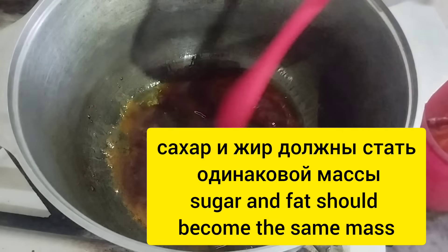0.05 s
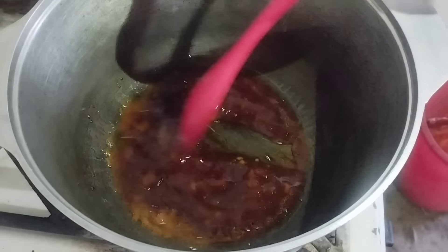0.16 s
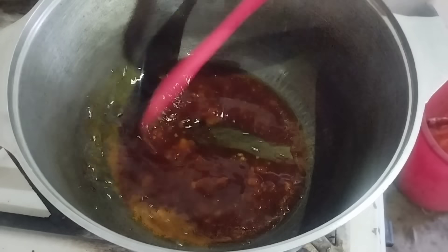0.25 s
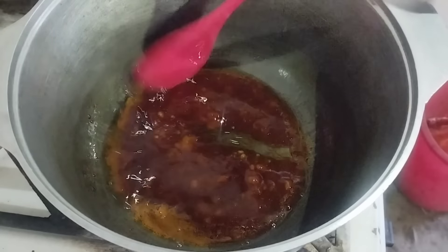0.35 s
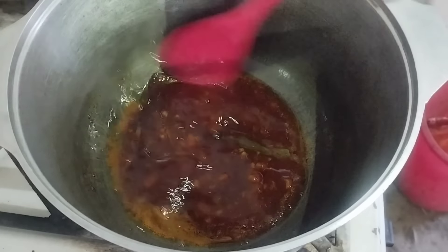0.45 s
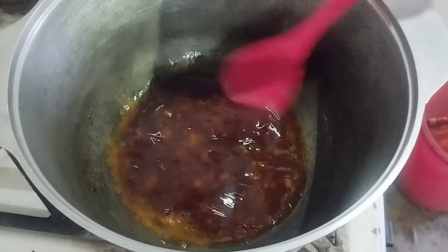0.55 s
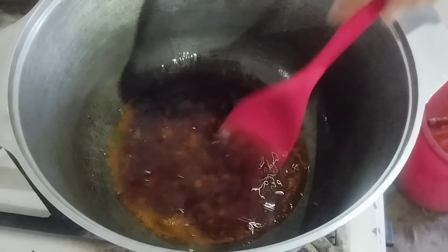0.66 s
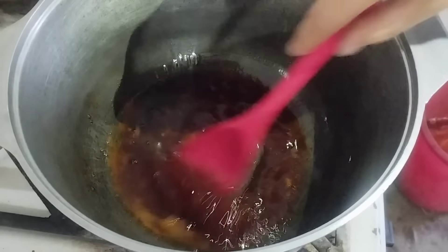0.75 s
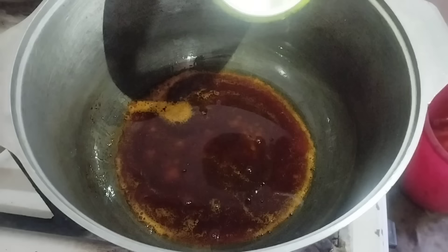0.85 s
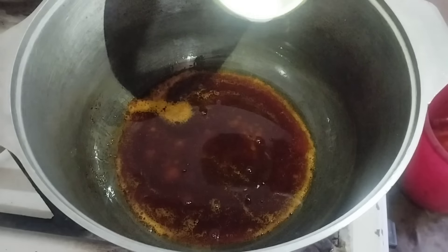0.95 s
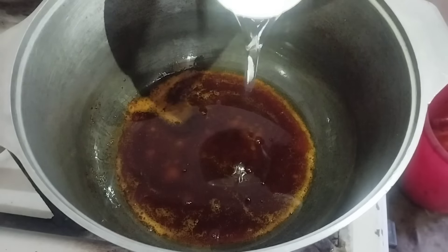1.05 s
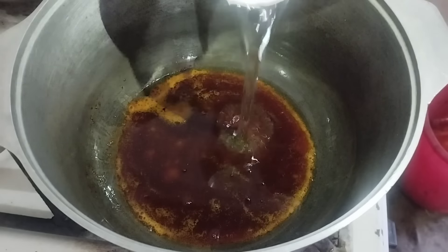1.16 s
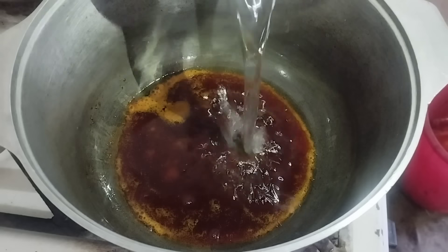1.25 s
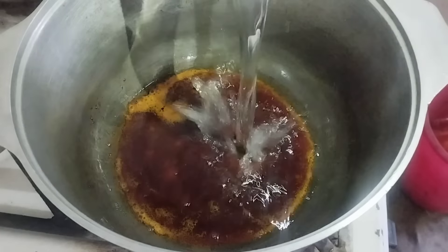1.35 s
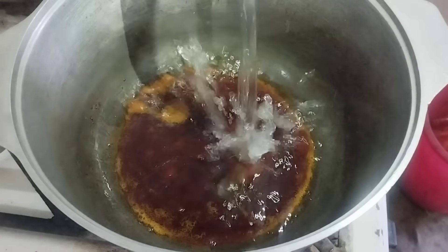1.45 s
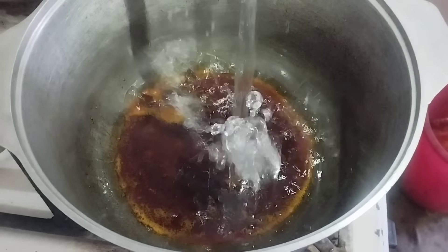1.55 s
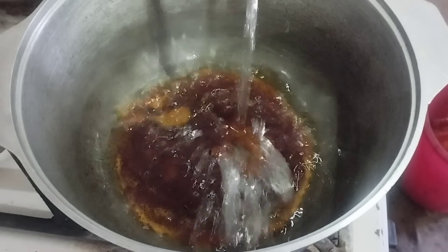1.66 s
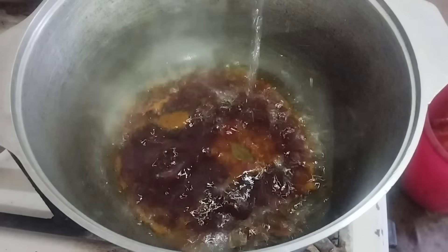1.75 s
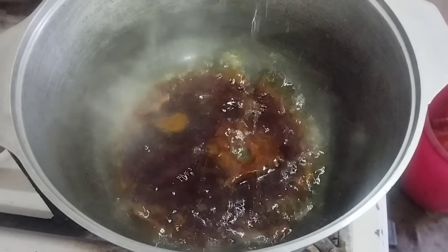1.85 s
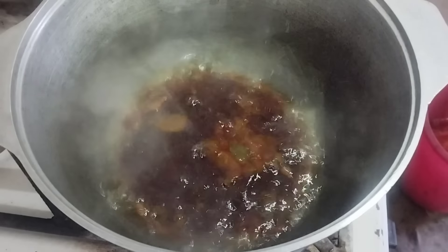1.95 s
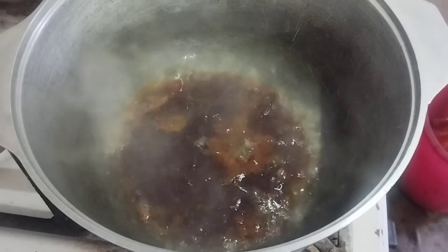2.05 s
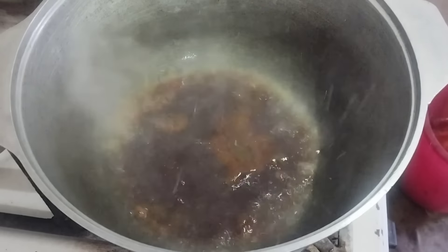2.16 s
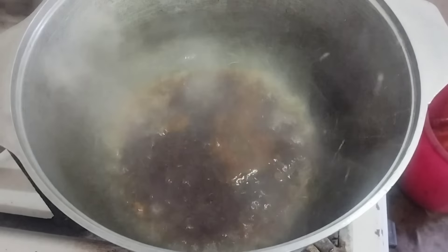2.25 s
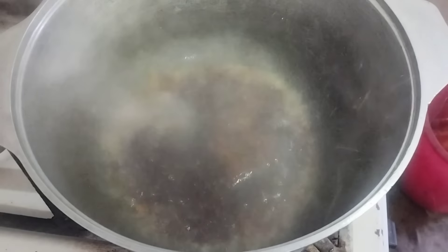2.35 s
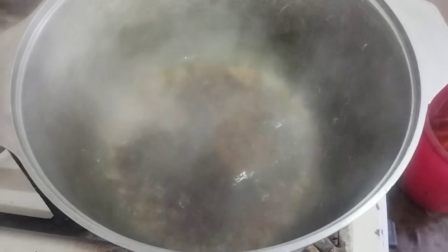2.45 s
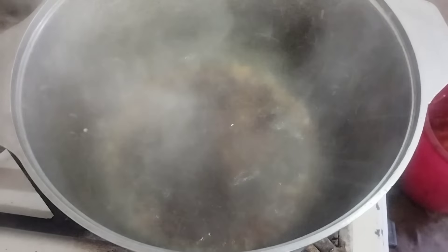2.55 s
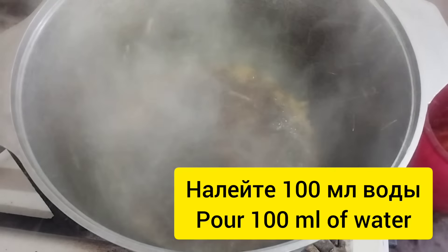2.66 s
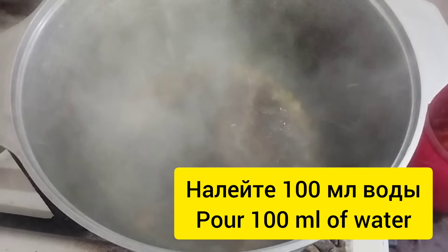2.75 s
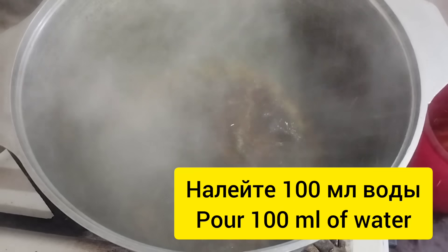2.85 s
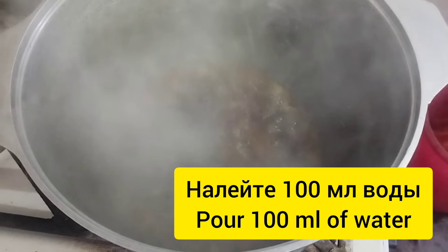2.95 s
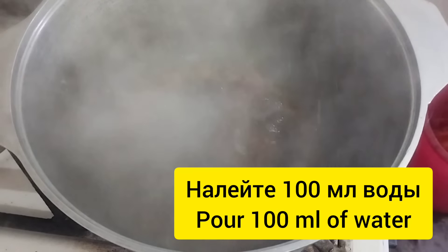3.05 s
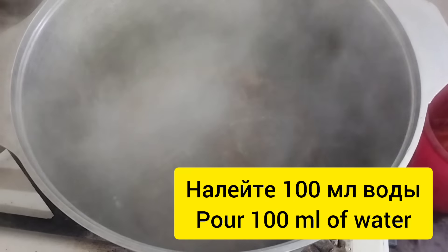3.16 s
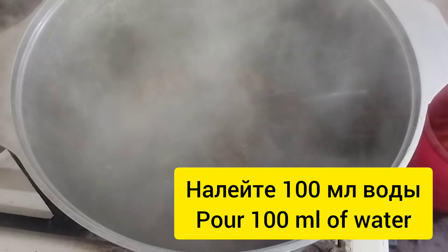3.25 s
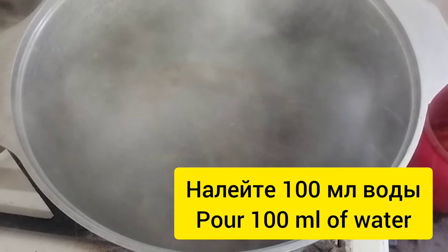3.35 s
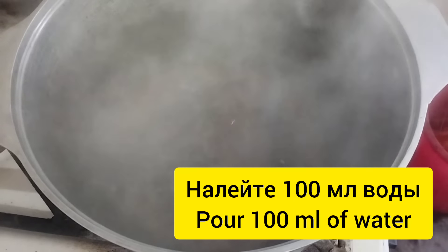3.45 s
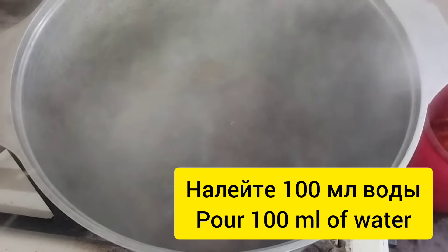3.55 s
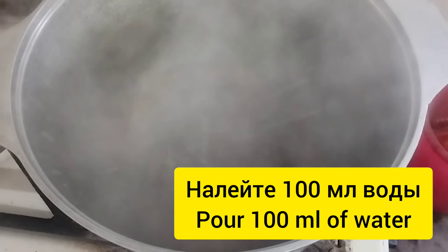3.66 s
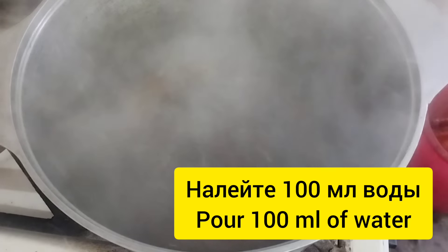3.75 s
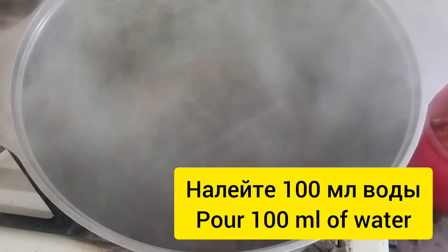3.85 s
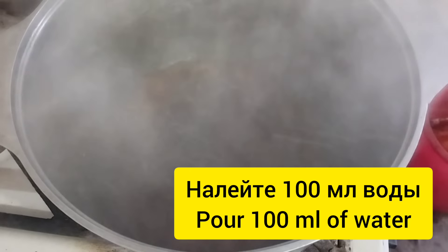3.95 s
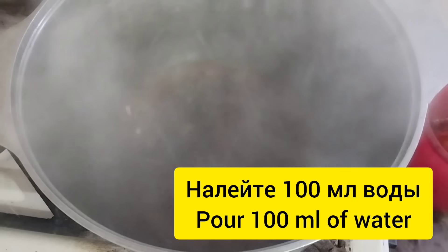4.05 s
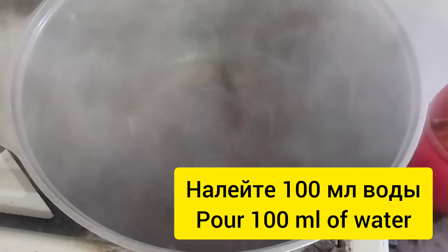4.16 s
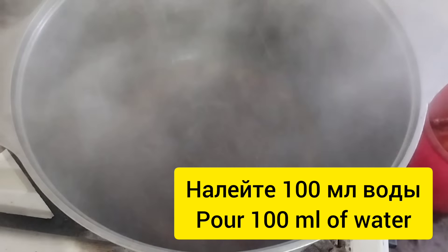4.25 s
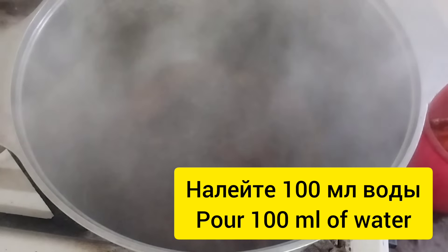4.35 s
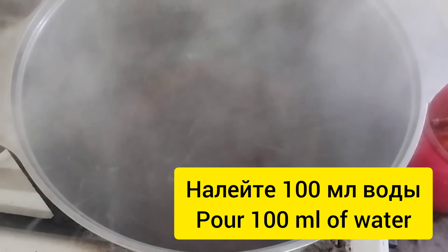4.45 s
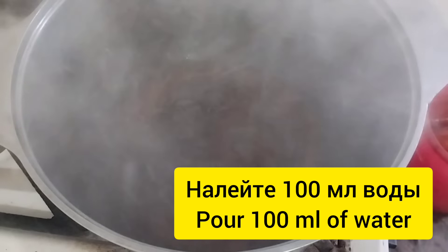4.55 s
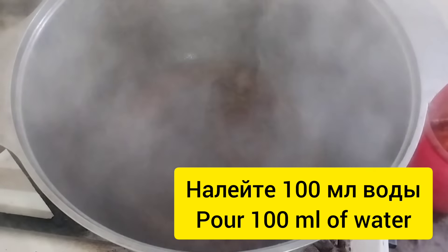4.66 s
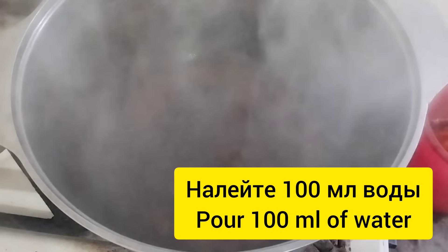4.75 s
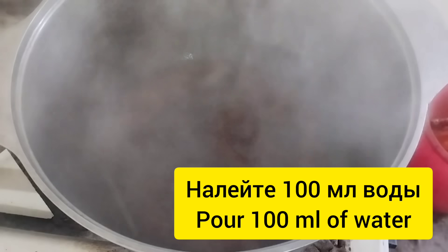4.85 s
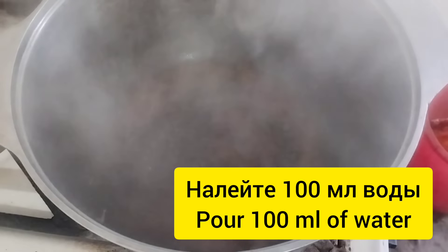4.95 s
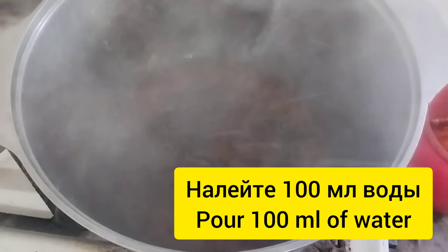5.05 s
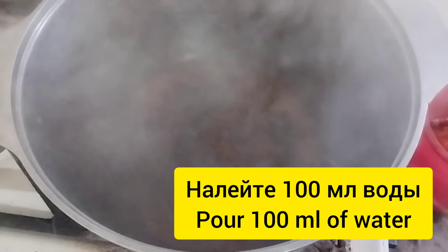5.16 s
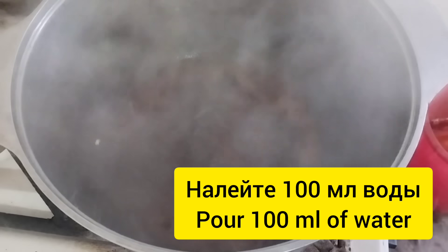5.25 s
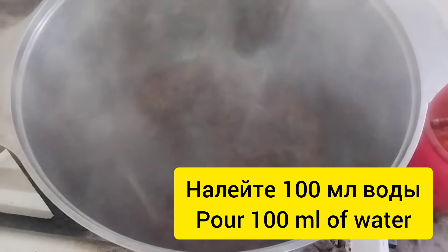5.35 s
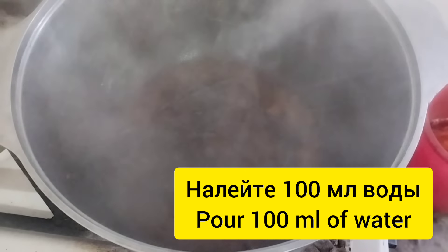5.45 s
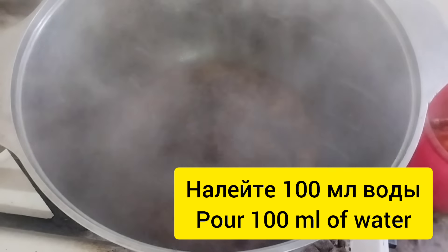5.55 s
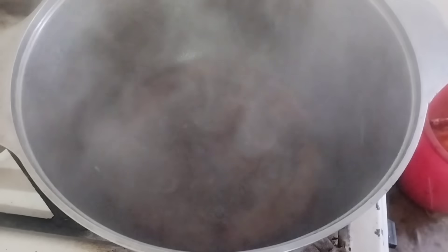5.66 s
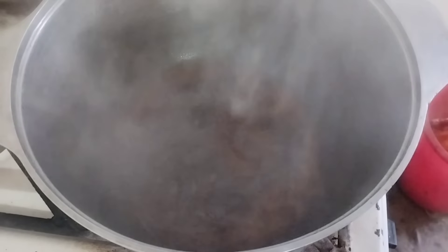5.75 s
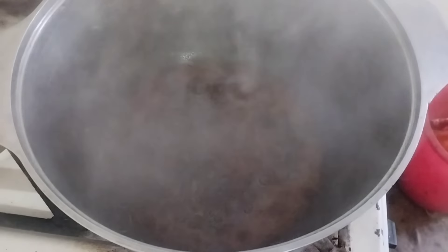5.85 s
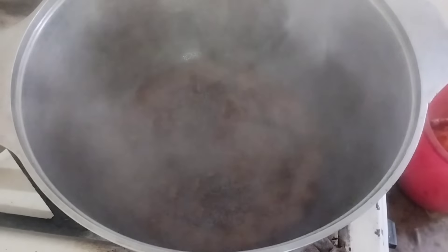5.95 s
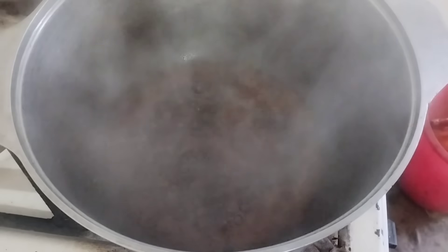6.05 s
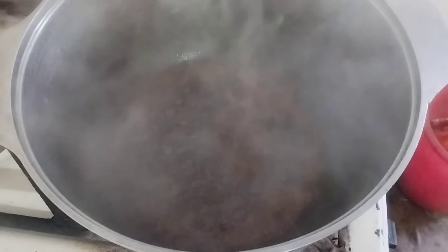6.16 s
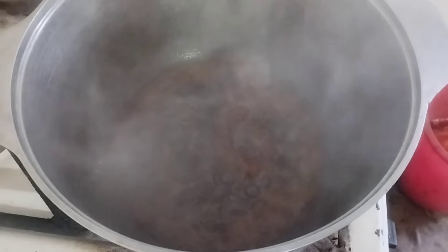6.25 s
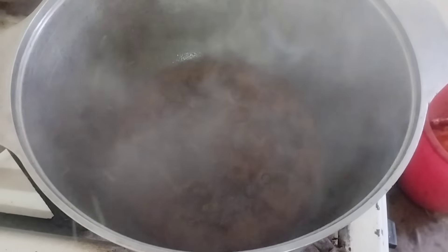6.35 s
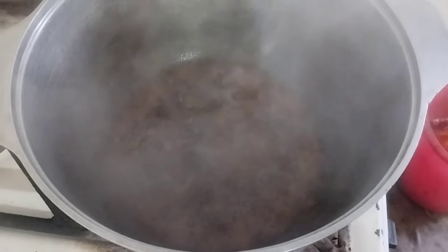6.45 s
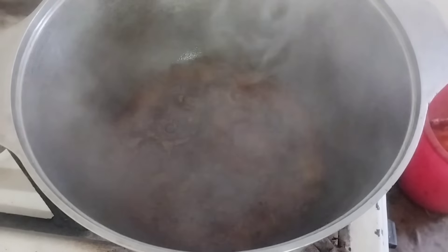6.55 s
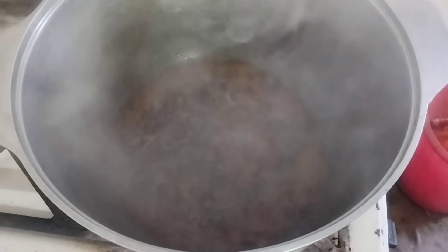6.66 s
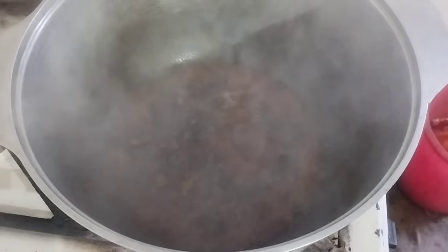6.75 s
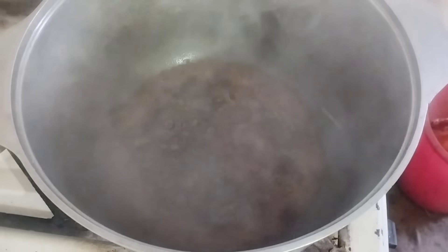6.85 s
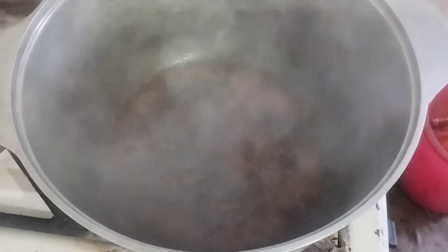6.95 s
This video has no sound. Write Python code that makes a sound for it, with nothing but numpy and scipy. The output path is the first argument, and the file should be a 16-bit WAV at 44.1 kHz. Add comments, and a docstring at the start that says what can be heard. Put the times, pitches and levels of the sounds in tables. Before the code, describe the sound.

A kitchen, recorded close to a metal pot in stereo. For the first 1.2 seconds there is only faint low room noise and hum, with a very soft spatula swish near 0.1. From 1.2 to 1.4 water drops hit the hot sugar and oil in separate sharp spits, mostly leftward. Small watery blips follow, and around 1.55 the pot flashes into a loud, bright, dense sizzle with a hollow gurgle that fades over the next few seconds. Fine crackle, larger snaps and bubbling ring within the pot. From 1.9 to about 5.3 steam gusts knock the left microphone with dull low thumps, busiest between 2.2 and 3.4, with rumble around 3; another comes at 6.4. Irregular hard pops punctuate 1.9 to 6.1, strongest near 3.1, with the sizzle briefly ducking under big blows. The hiss flutters, slightly softer around 4 to 5, and continues strongly to 7, bubbling calming at the end.

```python
"""A kitchen: water is poured into melted sugar and oil in a metal pot, close to a stereo camera.
The first drops spit as puffs of noise; then the pot flashes into a loud sizzle of merging noise bursts.
Bubbles and steam pops, made of noise and pressure swings, ring the resonances of the air in the pot.
Gusts of rising steam jolt the left microphone with dull thumps: decaying pressure steps.
Strong swings make a limiter briefly duck the sizzle; a soft swish and faint room noise lie beneath."""
import sys
import numpy as np
from scipy import signal
from scipy.fft import rfft, irfft, next_fast_len
from scipy.io import wavfile
from scipy.ndimage import uniform_filter1d, minimum_filter1d

SR = 44100
rng = np.random.default_rng(int(sys.argv[2]) if len(sys.argv) > 2 else 0)


def put_to_file(sound):
    """Save the sound as 16-bit audio at rate SR, in the file named by the first command-line argument."""
    columns = np.atleast_2d(sound).T  # one column per channel
    safe = np.clip(columns, -1, 1)
    whole_steps = np.round(safe * 32767)
    wavfile.write(sys.argv[1], SR, whole_steps.astype(np.int16))


N = 309141
TIME = np.arange(N) / SR
TAPS = 4096  # length of filters and of short events, in samples
HZ = np.fft.rfftfreq(TAPS, 1 / SR)
EDGE_HZ = 15780  # upper band limit
# the water flashes to steam, and later its plume is thickest
FLASH_S, PLUME_S, PLUME_WIDTH_S = 1.53, 3.07, 1

# vigour of the boil: (time [s], relative level [dB], left minus right [dB])
BOIL_VIGOUR = [(1.24, -37, 2), (1.45, -35, 2), (1.57, -21, -0.5), (1.67, -25, 5.5), (1.78, -22.5, 4.5),
               (2.05, -20.5, 1), (2.18, -21, 7.5), (2.3, -19.5, 0), (2.62, -20, 2.5), (3.8, -22.5, 4),
               (3.92, -26, 5.5), (3.97, -21.5, 1.5), (4.14, -26.5, 1.5), (4.28, -22, -1.5), (4.57, -24, 1),
               (4.75, -23, 0.5), (5.06, -23.5, 3.5), (5.15, -21.5, 1), (6.33, -21.5, 1), (6.45, -25, 3),
               (6.55, -22, 1), (7.01, -20.5, 0)]
# spectrum of the sizzle: (frequency [Hz], level [dB])
SIZZLE_SPECTRUM = [(40, -17.5), (150, -24), (400, -13), (900, -10.5), (1600, -6.5), (3000, -2), (5200, 2),
                   (6800, 1), (9000, -5.5), (11000, -4.5), (13500, 1), (15600, 3)]
# spectrum of larger snaps in the fat: (frequency [Hz], level [dB])
SNAP_SPECTRUM = [(100, -16.5), (500, -8), (1200, -2.5), (3000, -3), (5300, 4.5), (7000, 0), (10000, -34),
                 (15500, -1)]
# spectrum of the slower bubbles: (frequency [Hz], level [dB])
BUBBLE_SPECTRUM = [(40, -2), (130, -7), (250, 3), (600, -1), (900, -3), (2000, -11), (6000, -49)]
# the largest steam pockets burst through the syrup:
# (time [s], relative level [dB], treble against mids [dB], left minus right [dB])
STEAM_POPS = [(1.9451, -11, -4, -3), (1.9478, -9, -2, 2), (2.5396, -9, -1, 2), (2.655, -10, -3, -3),
              (2.9772, -9, -3, 0), (3.1168, -2, -4, 5), (3.1573, -11, 5, -3), (3.1827, -9.5, -2, -2),
              (3.2587, -9, -2, 3), (3.4905, -7.5, -2, -2), (3.8514, -6, -6, 2), (3.9915, -8.5, -3, 2),
              (4.0428, -11.5, 1, -3), (4.0823, -9.5, 3, -1), (4.4191, -12.5, 3, 1), (4.4958, -13.5, 8, -3),
              (4.5102, -9, -14, 0), (5.0093, -8, -1, 1), (5.2171, -12.5, 0, 2), (5.4186, -11, -3, -3),
              (5.7783, -8, -2, 0), (6.1206, -11, -10, 1)]
# spectrum of a pop's body: (frequency [Hz], level [dB])
POP_SPECTRUM = [(60, -10), (250, 0), (600, -1), (1050, -9), (2800, -7), (5000, -8), (9000, -20),
                (16000, -28)]
# the first drops flash on the hot fat: (time [s], relative peak level [dB], left minus right [dB])
FIRST_DROPS = [(1.1987, -32, -1), (1.2241, -27, 9), (1.237, -26, 0), (1.251, -15, -2), (1.2583, -18.5, 13),
               (1.2664, -19, 0), (1.2918, -20, 8), (1.302, -13.5, 4), (1.3408, -17, 10), (1.3931, -15, 4)]
# gusts of steam strike the left microphone: (time [s], relative push or pull [1], longest hold [s])
STEAM_JOLTS = [(1.876, -0.42, .3), (2.0132, -0.61, 0.33), (2.246, -0.28, .3), (2.263, 1.2, .3),
               (2.2907, -0.87, .3), (2.319, -1.6, 0.035), (2.44, 0.38, .3), (2.506, -0.51, .012),
               (2.542, -1.4, .3), (2.6786, -0.7, .3), (2.711, 0.83, .3), (2.768, -1.8, 0.0049),
               (2.8198, -1.17, .027), (2.978, -0.71, 0.27), (3.0074, -1.2, 0.0059), (3.033, 0.9, .3),
               (3.119, -2.5, .3), (3.2593, -0.5, .3), (3.278, .9, .3), (3.388, -1.06, .02),
               (3.9356, 1.2, 0.33), (3.9944, -1.3, .3), (4.029, -0.95, 0.0063), (4.1607, -0.19, .3),
               (4.4445, 2.4, 0.44), (4.883, -0.66, .3), (4.941, 0.42, .4), (5.28, -2, 0.62),
               (6.3892, -0.87, .4)]
# spectrum of steam brushing the microphones: (frequency [Hz], level [dB])
BUFFET_SPECTRUM = [(20, -1), (70, 1), (220, -6), (500, -22.5), (2000, -68)]
# air dragged under by the stream, and the largest bubbles:
# (time [s], starting pitch [Hz], relative level [dB], decay [s])
AIR_POCKETS = [(1.391, 560, -23.5, 0.0073), (1.434, 488, -30, 0.016), (1.462, 446, -29.5, .016),
               (1.524, 1120, -20, 0.0051), (1.541, 2690, -20, 0.013), (1.553, 1090, -20, .0071),
               (1.567, 663, -19.5, 0.0095), (1.582, 521, -24.5, .016), (1.736, 1135, -24, .014),
               (5.566, 338, -22, 0.018)]
# spectrum of the soft blade in the melt: (frequency [Hz], level [dB])
SWISH_SPECTRUM = [(100, -4), (350, -2), (650, -12), (1300, -8), (2000, -20), (8000, -35)]
# spectrum of the room: (frequency [Hz], level [dB])
ROOM_SPECTRUM = [(20, -4), (42, -1), (60, 1), (100, -8), (200, -12.5), (370, -12.5), (560, -18.5),
                 (1200, -28), (5000, -34), (6300, -30.5), (8000, -42.5), (11000, -40.5), (15500, -32)]
# hum bands of the kitchen: (frequency [Hz], width [Hz], lift [dB])
HUM_BANDS = [(58, 12, 2), (129, 33, 5), (324, 14, 10.5), (370, 28, 8.5), (1770, 100, 8), (6300, 330, 5)]
# modes of the air in the pot: (frequency [Hz], width [Hz], lift [dB])
POT_MODES = [(369.5, 24, 8.5), (436, 22, 8), (527, 63, 11), (584, 110, 10), (644.4, 26, 11.5), (745, 15, 7),
             (1263, 93, 4), (2017, 44, 7), (2660, 39, 4), (3340, 72, 2.5)]
# the two microphones face the pot differently: (frequency [Hz], left minus right [dB])
MIC_FACING = [(100, 3), (600, 0), (2500, 0), (5200, -4), (7500, -2.5), (9500, 10.5), (11200, 2),
              (12500, 6.5), (15600, 2.5)]
# sound cancels in the microphone ducts:
# (frequency [Hz], width [Hz], depth in the left [dB], depth in the right [dB])
DUCT_NOTCHES = [(8137, 574, 29.6, 11.8), (11150, 920, 1.3, 11)]
# left-right likeness of the pot's sound: (frequency [Hz], correlation [1])
POT_LIKENESS = [(100, 0.75), (350, 0.72), (600, 0.91), (900, 0.56), (1300, 0.25), (1900, -0.063),
                (2500, 0.053), (4700, 0.0016), (7000, -0.022)]
# left-right likeness of the room's sound: (frequency [Hz], correlation [1])
ROOM_LIKENESS = [(60, 0.81), (300, 0.88), (650, .35), (1500, .05)]


def sizzle(level_db=3.5, wash_db=-1, flutter_db=0.72, surge_db=1.15, surges_per_s=14, merge=0.84, full_db=-24):
    """Superposition: droplets boiling off in the fat crackle, and merge into steam hiss as the boil grows."""
    db, pan_db = curves(BOIL_VIGOUR)
    crackle = bursts(per_s=1500, spread_db=1.0, ring_s=0.0013, scatter_db=5.5)
    wash_gain = amp(wash_db + merge * (db - full_db))
    wash = wash_gain * rng.standard_normal((2, N))
    drive = (crackle + wash) / np.hypot(1, wash_gain)
    drive = drive * amp(flutter_db * flutter(70))
    spectrum_db = read(SIZZLE_SPECTRUM) + pot_db() + echoes_db()
    hiss = unit(colour(pair(drive, POT_LIKENESS), spectrum_db))
    # larger bubbles fill in the lower part of the hiss
    lowpass = signal.butter(1, 3500, fs=SR, output="sos")
    lower = signal.sosfiltfilt(lowpass, hiss)
    hiss = hiss + (amp(coarseness_db()) - 1) * lower
    # each side of the pot surges on its own
    surges = np.array([flutter(surges_per_s), flutter(surges_per_s)])
    return hiss * amp(db + level_db + surge_db * surges) * sides(pan_db)


def coarseness_db(flash_db=5, settled_db=2, grow_db_per_s=42, settle_s=2.9):
    """Larger bubbles sound lower: they grow until the flash, then slowly get finer, moving the low mids."""
    age = TIME - FLASH_S
    settling = (flash_db - settled_db) * np.exp(-np.maximum(age, 0) / settle_s)
    growth = grow_db_per_s * np.minimum(age, 0)
    return settled_db + settling + growth


def snaps(level_db=-8):
    """Impulsive evaporation: larger droplets snap amid the fine crackle, about ninety times a second."""
    db, _ = curves(BOIL_VIGOUR)
    drive = bursts(per_s=90, spread_db=2, ring_s=.001, scatter_db=5)
    return amp(db + level_db) * unit(colour(drive, read(SNAP_SPECTRUM) + pot_db()))


def bubbling(level_db=-35, follow=0.64, full_db=-22, start_s=1.34, build_s=0.084,
             heave_db=1, calm_s=6.38, calm_db=-4):
    """Cavity resonance: slow bubbles ring the low modes, follow the boil, heave at random and at last calm."""
    drive = bursts(per_s=260, spread_db=1.0, ring_s=0.0064, scatter_db=7)
    boil_db = follow * (curves(BOIL_VIGOUR)[0] - full_db)
    db = level_db + boil_db + heave_db * flutter(7) + calm_db * (TIME > calm_s)
    build = np.clip((TIME - start_s) / build_s, 0, 1)
    ringing = unit(colour(pair(drive, POT_LIKENESS), read(BUBBLE_SPECTRUM) + pot_db()))
    return build * amp(db) * ringing


def pops(body_db=-1, crack_db=1, snap_s=.00012, spray_db=-14):
    """Impulse excitation: a bursting steam pocket's single pressure swing rings the pot, with a crack of spray."""
    out, path_db = np.zeros((2, N)), pot_db()
    for s, db, treble_db, pan_db in STEAM_POPS:
        # the duller pops come from larger pockets, which snap more slowly
        width_s = snap_s * amp(-treble_db / 6) * rng.uniform(.9, 1.1)
        u = (TIME[:TAPS] - .0014) / width_s
        swing = -u * np.exp(-u ** 2 / 2)
        spray = puff(rise_s=.0013, fall_s=.0008, tail_db=-13, tail_s=.004)
        body = peaked(colour(swing + amp(spray_db) * spray, read(POP_SPECTRUM) + path_db))
        crack = peaked(colour(spray, read(SNAP_SPECTRUM) + path_db))
        pop = amp(body_db) * body + amp(treble_db + crack_db) * crack
        add(out, s, amp(db) * sides(pan_db) * pop)
    return out


def spits(level_db=1, bright_db=4):
    """Flash evaporation: single drops crack on the fat before the boil takes hold."""
    out = np.zeros((2, N))
    tone_db = read(SIZZLE_SPECTRUM) + pot_db() + bright_db * HZ / HZ[-1]
    for s, db, pan_db in FIRST_DROPS:
        crack = colour(puff(rise_s=.001, fall_s=.0008, tail_db=-15, tail_s=.007), tone_db)
        add(out, s, amp(db + level_db) * sides(pan_db) * peaked(crack))
    return out


def thumps(edge_s=0.00055, leak_s=0.051, right_db=-36):
    """Membrane pressure: a gust's push leaks and swings back, until release or the next gust."""
    pressure = np.zeros(N)
    for s, push, hold_s in STEAM_JOLTS:
        start = round(s * SR)
        u = TIME[:N - start] / leak_s
        # overwriting the rest lets each gust end the one before
        pressure[start:] = push * (1 - u) * np.exp(-u) * (u < hold_s / leak_s)
    t = (np.arange(257) - 128) / SR
    edge = 1 / np.cosh(np.pi * t / edge_s) ** 2
    smoothed = np.convolve(pressure, edge / edge.sum(), "same")
    return amp([[0], [right_db]]) * smoothed


def rumble(level_db=-38, pan_db=14):
    """Flow noise: the thickest plume of steam buffets the microphones, chiefly the left."""
    drive = bursts(per_s=90, spread_db=1, ring_s=0.0061, scatter_db=3)
    gusts = colour(drive, read(BUFFET_SPECTRUM))
    return amp(level_db) * sides(pan_db) * unit(gusts) * plume(TIME) ** 2


def plume(s):
    """Growth and decay: the steam's thickness, 0-1, builds, peaks and thins out as a bell curve."""
    return np.exp(-((s - PLUME_S) / PLUME_WIDTH_S) ** 2 / 2)


def spatter(level_db=-32, pan_db=-3, lag_s=.5):
    """Sparse impulses: small bright pops fly, strongest just after the thick of the plume."""
    drive = bursts(per_s=14, spread_db=1, ring_s=.0009, scatter_db=4)
    cracks = unit(colour(drive, read(SNAP_SPECTRUM) + pot_db()))
    return (TIME > FLASH_S) * amp(level_db) * sides(pan_db) * plume(TIME - lag_s) * cracks


def pour(level_db=-37, start_s=1.5, fade_s=0.99, ring_hz=1130, width_hz=220):
    """Driven resonance: the stream churns the melt with a hollow gurgle around one frequency."""
    detuning = ring_hz / width_hz * (HZ / ring_hz - ring_hz / (HZ + 1))
    hollow_db = -10 * np.log10(1 + detuning ** 2)
    churn = colour(bursts(per_s=500, spread_db=5, ring_s=0.0018, scatter_db=6), hollow_db)
    age = np.maximum(TIME - start_s, 0)
    return amp(level_db) * unit(churn) * np.minimum(age / 0.034, 1) * np.exp(-age / fade_s)


def gulps(rise_per_s=1.45):
    """Bubble resonance: single air pockets ring and rise in pitch as they surface."""
    out, t = np.zeros((2, N)), TIME[:TAPS]
    for s, hz, db, decay_s in AIR_POCKETS:
        tone = np.sin(2 * np.pi * hz * t * (1 + rise_per_s * t / 2))
        ring = tone * np.exp(-t / decay_s) * np.minimum(t / 0.0013, 1)
        add(out, s, amp(db) * sides(1) * ring)
    return out


def spatula(s=0.12, length_s=0.043, level_db=-59):
    """Friction noise: the soft blade swishes once through the melt, under a bell-shaped envelope."""
    swish = unit(colour(rng.standard_normal((2, N)), read(SWISH_SPECTRUM)))
    return amp(level_db) * swish * np.exp(-((TIME - s) / length_s) ** 2)


def kitchen(level_db=-55, waver_db=-1.0):
    """Ambient noise: low rumble, faint hum bands and hiss of the room, from coloured noise."""
    noise = pair(rng.standard_normal((2, N)), ROOM_LIKENESS)
    air = colour(noise, read(ROOM_SPECTRUM) + lifts(HUM_BANDS))
    return amp(level_db + waver_db * flutter(11.0)) * unit(air)


def pot_db():
    """Transfer function: air modes, facing and duct notches colour the way from pot to microphones."""
    notches = 0
    for hz, width, left, right in DUCT_NOTCHES:
        notches = notches + np.array([[left], [right]]) / (1 + (2 * (HZ - hz) / width) ** 2)
    return lifts(POT_MODES) - notches + np.array([[.5], [-.5]]) * read(MIC_FACING)


def echoes_db(echo_db=-27, latest_s=.03, count=16):
    """Comb filtering: early echoes off pot wall and stove interfere, differently at each microphone."""
    delay = rng.uniform(0.0032, latest_s, (count, 2, 1))
    depth = amp(echo_db) * HZ / (HZ + 900)  # the rim reflects short waves best
    echoes = depth * np.exp(-2j * np.pi * HZ * delay).sum(0)
    return 20 * np.log10(abs(1 + echoes) + 1e-3)


def lifts(modes):
    """Resonance: each mode lifts a band in dB; where bands overlap the strongest counts."""
    return np.max([db / (1 + (2 * (HZ - hz) / width) ** 2) for hz, width, db in modes], axis=0)


def bursts(per_s, spread_db, ring_s, scatter_db):
    """Shot noise: random bursts of uneven size, each a noise puff that dies as it bounces round the pot."""
    happens = rng.random(N) < per_s / SR
    size = amp(spread_db * np.minimum(rng.exponential(1, N), 5)) * happens
    power = (size * sides(scatter_db * rng.standard_normal(N))) ** 2
    power = signal.lfilter([1], [1, -np.exp(-2 / (ring_s * SR))], power)
    return unit(np.sqrt(power) * rng.standard_normal((2, N)))


def puff(rise_s, fall_s, tail_db, tail_s):
    """Transient and reverberation: a short stereo noise burst with a faint tail from the pot walls."""
    t = TIME[:TAPS]
    fall = np.exp(-np.maximum(t - rise_s, 0) / fall_s)
    tail = amp(tail_db) * np.exp(-t / tail_s)
    shape = np.minimum(t / rise_s, 1) ** 2 * (fall + tail)
    return shape * rng.standard_normal((2, TAPS))


def flutter(per_s):
    """Random modulation: chance values at per_s a second, joined by lines and scaled to rms 1."""
    knots = rng.standard_normal(N // 20)
    return unit(np.interp(TIME * per_s, np.arange(len(knots)), knots))


def pair(x, likeness):
    """Interaural coherence: blends two unrelated channels to a given likeness at each frequency."""
    size = next_fast_len(2 * N)
    correlation = read(likeness, np.fft.rfftfreq(size, 1 / SR))
    turn = np.arcsin(np.clip(correlation, -1, 1)) / 2
    z = rfft(x, size)
    return irfft(np.cos(turn) * z + np.sin(turn) * z[::-1], size)[:, :N]


def colour(x, db):
    """Minimum phase: folding the cepstrum makes a causal filter with the given gain per frequency."""
    cepstrum = irfft(np.log(amp(np.atleast_2d(db))))
    cepstrum[:, 1:TAPS // 2] *= 2
    cepstrum[:, TAPS // 2 + 1:] = 0
    impulse = irfft(np.exp(rfft(cepstrum)))
    return signal.fftconvolve(x, impulse, axes=1)[:, :x.shape[1]]


def amp(db):
    """Logarithmic level: decibels to gain."""
    return 10 ** (np.asarray(db) / 20)


def unit(x):
    """Mean power: scales to rms 1."""
    return x / np.sqrt(np.mean(x ** 2) + 1e-20)


def peaked(x):
    """Peak level: scales so that the mean of the two channels peaks at 1."""
    return x / abs(x.mean(0)).max()


def sides(pan_db):
    """Level difference between channels: left and right gains."""
    return amp(np.array([pan_db, -pan_db]).reshape(2, -1) / 2)


def read(points, hz=HZ):
    """Logarithmic frequency: interpolates a spectrum table along a log axis."""
    f, value = np.transpose(points)
    return np.interp(np.log(hz + 1), np.log(f + 1), value)


def curves(table):
    """Envelopes: interpolates each column of a curve table at every sample."""
    s, *columns = np.transpose(table)
    return [np.interp(TIME, s, c) for c in columns]


def add(mix, s, sound):
    """Superposition: mixes a stereo sound in at time s."""
    part = mix[:, round(s * SR):][:, :sound.shape[1]]
    part += sound[:, :part.shape[1]]


def limiter(x, threshold_db=-13, slope=0.3, sense_s=0.0043, hold_s=0.093, ahead_s=0.0041,
            glide_s=0.013, link=0.28):
    """Gain reduction: a large swing turns its channel down, the other a little; gain holds, then glides back."""
    power = abs(uniform_filter1d(x ** 2, round(sense_s * SR), axis=1))
    level_db = 10 * np.log10(power + 1e-12)
    cut_db = -slope * np.maximum(level_db - threshold_db, 0)
    # the deepest cut starts slightly ahead of the swing and is held after it
    hold = round((hold_s + ahead_s) * SR)
    cut_db = minimum_filter1d(cut_db, hold, axis=1, origin=(hold - 1) // 2 - round(ahead_s * SR))
    cut_db = uniform_filter1d(cut_db, round(glide_s * SR), axis=1)
    return x * amp(np.minimum(cut_db, link * cut_db[::-1]))


def scene():
    """Superposition of all sources: nothing boils until the water lands."""
    wet = np.clip((TIME - 1.215) / 0.023, 0, 1) ** 2
    boil = wet * (sizzle() + snaps() + bubbling() + rumble())
    events = pops() + spits() + thumps() + spatter() + pour() + gulps()
    return boil + events + spatula() + kitchen()


def record(dry):
    """Saturation and band limit: after the limiter the largest swings are rounded off, then low-passed."""
    held = limiter(dry)
    rounded = held / (1 + (held / .9) ** 8) ** (1 / 8)
    lowpass = signal.firwin(1023, EDGE_HZ, window=("kaiser", 8), fs=SR)
    return signal.oaconvolve(rounded, lowpass[None], "same")


dry = scene()
out = record(dry)
put_to_file(out)
```